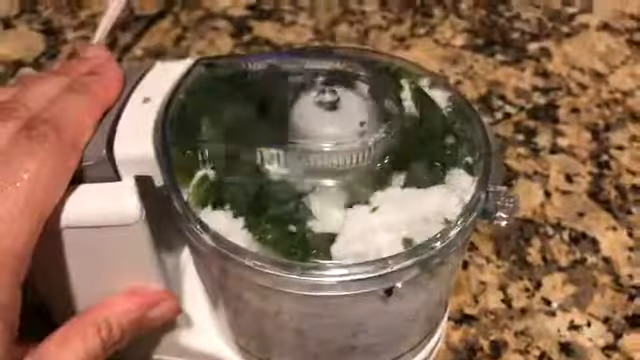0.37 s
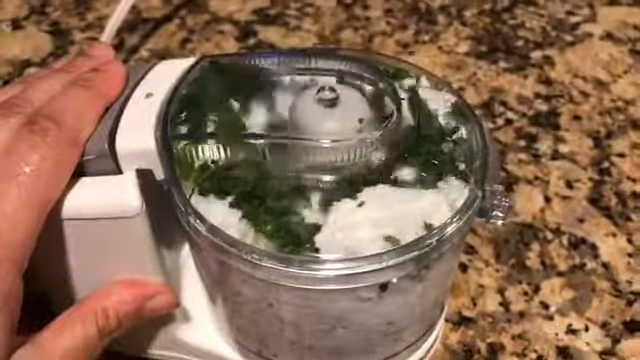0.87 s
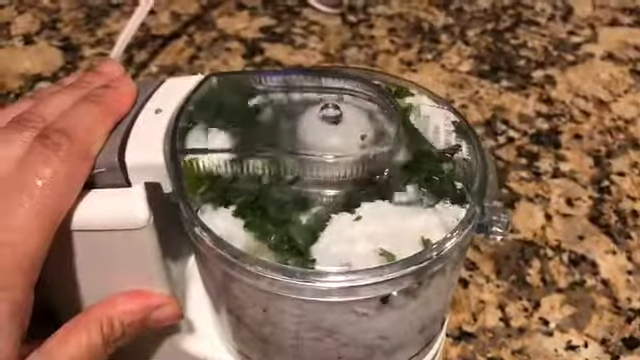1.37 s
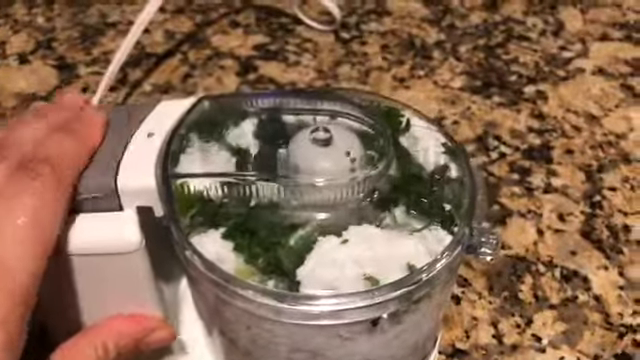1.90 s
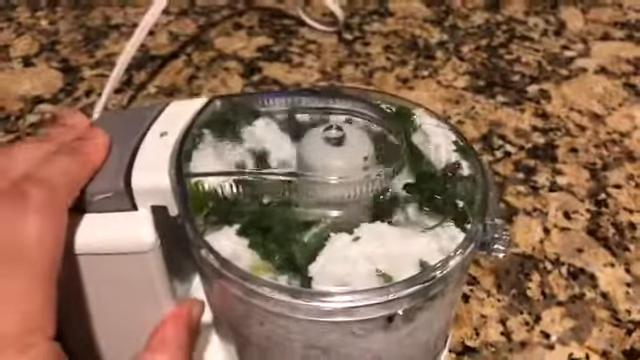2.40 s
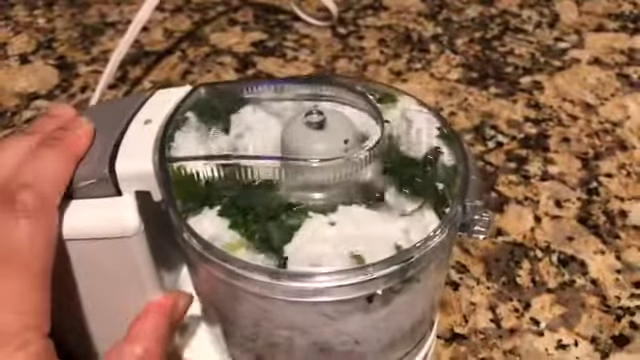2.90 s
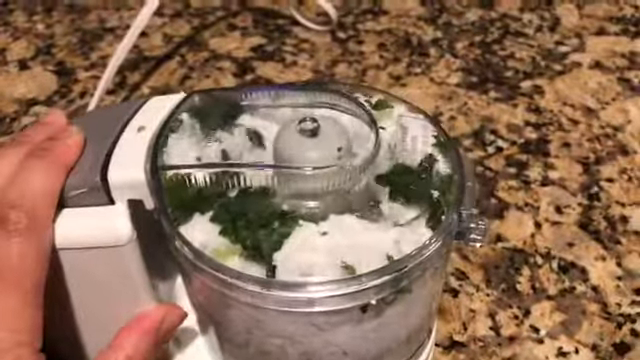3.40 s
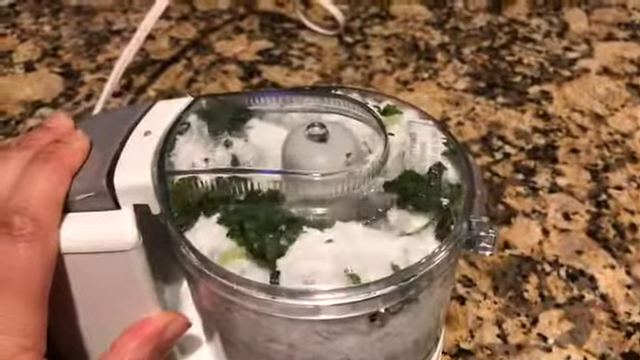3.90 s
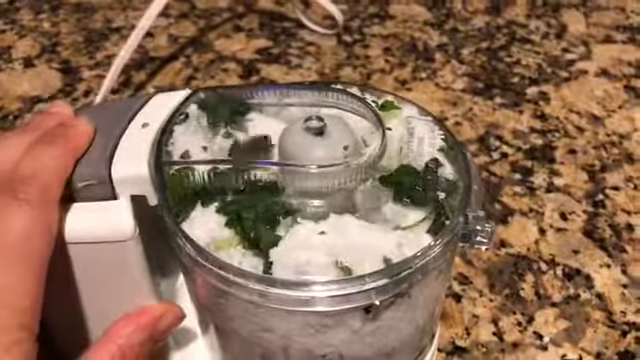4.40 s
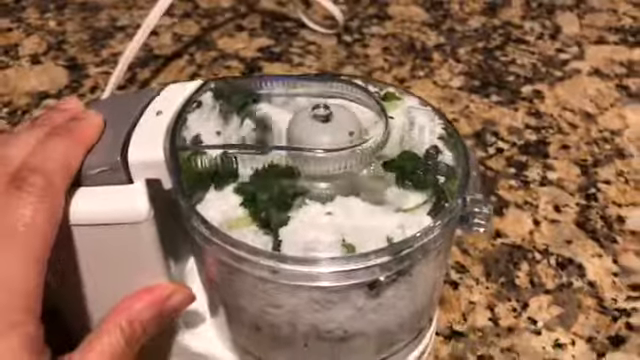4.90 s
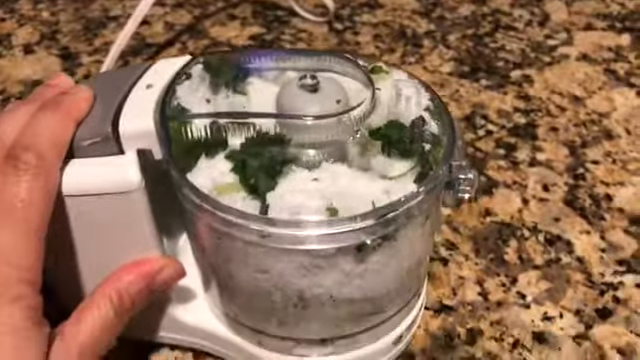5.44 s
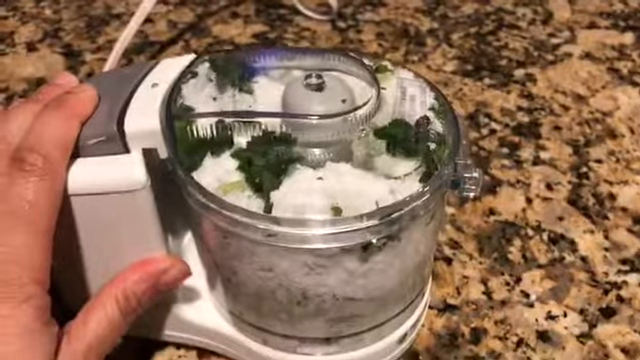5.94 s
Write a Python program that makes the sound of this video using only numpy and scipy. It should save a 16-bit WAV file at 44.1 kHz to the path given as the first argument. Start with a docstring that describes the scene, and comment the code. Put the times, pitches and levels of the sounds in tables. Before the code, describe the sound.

Close to a small food chopper in a kitchen, a switch clicks and a shrill geared whine leaps up with harsh plastic rattle and soft thuds of food. After about a second and a half it slides down to a near-quiet gap with faint ticks and a sharp click. A longer burst follows, coasts down, then a third begins before the motor has quite rested and runs to the end.

```python
"""Geared food chopper in three pulses

A small chopper on a stone counter: a motor pinion and a wheel mesh whine as tones on a running tooth count.
Noise knocks through housing resonances give the rattle of the teeth; lumps of food strike decaying bowl modes.
Filtered noise bursts make the switch clicks and faint ticks; a distant appliance hums as a sine over room noise.
A short noise tail forms the room, and gain control lifts the pauses."""
import sys
import numpy as np
from scipy import signal
from scipy.fft import rfft, irfft
from scipy.io import wavfile
from scipy.ndimage import uniform_filter1d

SR = 44100
rng = np.random.default_rng(int(sys.argv[2]) if len(sys.argv) > 2 else 0)


def elevation(decibels):
    """Turn decibel levels (scalar or array-like) into linear amplitude ratios."""
    levels = np.asarray(decibels, float)
    return 10 ** (levels / 20)


def wav_record(signal):
    """Record a signal, one row per channel, as 16-bit PCM in the file named by sys.argv[1]."""
    frames = np.transpose(np.atleast_2d(signal))
    bounded = np.clip(frames, -1, 1)
    # unit amplitude maps onto the largest positive 16-bit level
    quanta = np.round(bounded * 32767).astype(np.int16)
    wavfile.write(sys.argv[1], SR, quanta)


N = 266849
FULL_HZ = 2900   # pinion mesh rate taken as full speed

# Button presses: motor_on_s [s], motor_off_s [s], blade_angle at start [rad]
PULSES = [(0.165, 1.66, 1.2), (2.28, 4.35, -1.9), (4.773, 6.2, -2.5)]
# Food loading the drive: start_s [s], mesh_goal_hz [Hz, pinion], pinion_level_db [dB], wheel_level_db [dB]
LOAD = [(0.16, 2778, -25.5, -13.5), (0.4, 2807, -17.5, -22), (0.5, 2745, -16.5, -16.5),
        (0.6, 2776, -20, -17.5), (0.698, 2963, -21, -25), (0.8, 2808, -19, -19), (1.0, 2870, -23.5, -21),
        (1.102, 2920, -23, -21), (1.28, 2841, -21.5, -18), (1.38, 2977, -15.5, -17),
        (1.45, 2890, -17.5, -24), (1.6, 2963, -17.5, -18.5), (1.662, 2964, -25, -24.5),
        (2.27, 2800, -21, -14.5), (2.549, 2830, -22.5, -19.5), (2.63, 2905, -20.5, -20),
        (2.74, 3010, -15.5, -17.5), (2.852, 3000, -21, -21), (2.95, 2909, -16, -15.5),
        (3.172, 2893, -34, -25.5), (3.25, 2949, -17.5, -18), (3.298, 2834, -26, -16),
        (3.44, 2819, -22, -12), (3.54, 2900, -28, -21.5), (3.7, 2960, -24, -17.5),
        (3.79, 2801, -19.5, -16.5), (3.939, 2992, -25.5, -21), (4.04, 2924, -21.5, -17),
        (4.141, 2917, -23.5, -22.5), (4.3, 2998, -18.5, -18.5), (4.349, 2908, -24.5, -24),
        (4.76, 2827, -23.5, -13), (4.989, 2867, -26, -25.5), (5.09, 2995, -14, -14),
        (5.151, 2966, -16, -17.5), (5.332, 3016, -20.5, -19.5), (5.4, 3001, -17, -17.5),
        (5.491, 3005, -17, -13.5), (5.55, 2940, -17, -17), (5.638, 2961, -18, -16.5),
        (5.758, 3068, -19, -17), (5.838, 3028, -19.5, -15.5), (5.932, 3077, -26, -15.5),
        (6.05, 3012, -19, -17)]


def motor():
    """First-order spin-up to the loaded speed, then coasting under drag and dry friction to a halt.

    Returns the pinion mesh rate in Hz, starting surge 0-1, coasting 0-1 and engagement gain.
    """
    spin_up_s, head_start_s = .052, .006   # time constant; slack taken up at once
    surge_s, grip_s = 0.085, 0.004         # delay of peak starting torque; engagement of the teeth
    coast_s, friction_hz, still_hz = .4, 2900, 150
    now = np.arange(N) / SR
    load_s, goal_hz = np.transpose(LOAD)[:2]
    mesh_hz, surge, coasting, engaged = np.zeros((4, N))
    for on_s, off_s, angle in PULSES:
        since = np.maximum(now - on_s, 0)
        after = np.maximum(now - off_s, 0)
        loaded_hz = np.interp(np.minimum(now, off_s), load_s, goal_hz)
        driven_hz = loaded_hz * (1 - np.exp(-(since + head_start_s) / spin_up_s))
        pulse_hz = (driven_hz + friction_hz) * np.exp(-after / coast_s) - friction_hz
        turning = (now >= on_s) & (pulse_hz > still_hz)
        mesh_hz += turning * pulse_hz
        surge += (since / surge_s * np.exp(1 - since / surge_s)) ** 2
        coasting += turning * (1 - np.exp(-after / grip_s))
        fade = np.minimum(pulse_hz / still_hz - 1, 1)   # fades out just before standstill
        engaged += turning * (1 - np.exp(-since / grip_s)) * fade
    return np.maximum(mesh_hz, still_hz), surge, coasting, engaged


def whine(teeth, smear_hz, rough):
    """Phase synthesis: a tone on a tooth count, part clean, part smeared by uneven contact; rms near 1."""
    rough = np.clip(rough, 0, 1)
    smear = (drift(smear_hz) + 1j * drift(smear_hz)) / np.sqrt(2)
    envelope = np.sqrt(1 - rough) + np.sqrt(rough) * smear
    return np.sqrt(2) * np.real(envelope * np.exp(2j * np.pi * teeth))


# Weaker mesh partials: pinion_multiple [-], wheel_multiple [-], level_db [dB re rattle setting], smear_hz [Hz]
PARTIALS = [(0, 2, -6.5, 55), (1, 1, -16.5, 24), (3, 0, -11, 410), (4, 0, -16, 690), (5, 0, -20, 560)]
# Shaft unbalance tones: pinion_mesh_multiple [-], level_db [dB re rattle setting]
SHAKE = [(1 / 13, -21), (1 / 25.0, -19)]
# Housing resonances: pitch_hz [Hz], width_hz [Hz], level_db [dB]
HOUSING = [(895, 390, -13.5), (1395, 43, -6.5), (1785, 490, -6), (2008, 312, 3), (2535, 63, -2),
           (2685, 130, 0), (3260, 180, -6), (3687, 550, -6), (4307, 146, -9.5), (5602, 76, -3.5),
           (5962, 190, -9), (6182, 28, -3.5), (7180, 280, -15.5), (8640, 1400, -22.5), (9730, 90, -16),
           (11850, 170, -17), (14350, 1800, -25)]
# Broad casing spectrum under the resonances: pitch_hz [Hz], level_db [dB per Hz]
CASING = [(60, -24), (150, -21), (300, -17), (1000, -21), (2200, -6), (3500, -15.5), (5000, -18.5),
          (6500, -15.5), (8000, -26.5), (10500, -30), (13000, -27.5), (15500, -33)]


def gears(mesh_hz, pinion_db, wheel_db, octave_db, rattle_db, hiss_db):
    """Gear-mesh excitation: tones and tooth rattle, modulated by shaft turns, blade load and the mains."""
    pinion_teeth, teeth_per_blade_turn = 13, 138.3
    wheel_mesh = .6536   # second mesh rate over first
    mains_throb_hz = 120
    chatter_db, chatter_hz = 7, 35
    teeth = np.cumsum(mesh_hz * (1 + 0.00268 * drift(30.8))) / SR
    motor_turn = 2 * np.pi * teeth / pinion_teeth
    blade_turn = 2 * np.pi * np.cumsum(mesh_hz) / SR / teeth_per_blade_turn
    for on_s, off_s, angle in PULSES:
        start = int(on_s * SR)
        blade_turn[start:] += angle - blade_turn[start]

    # two unlike blades load and unload the wheel
    bite_db = 3.5 * np.cos(blade_turn) + 4.5 * np.cos(2 * blade_turn + 2.1) + 2.5 * np.cos(3 * blade_turn - 1.5)
    bite = rms_one(elevation(bite_db))
    throb = 1 + .16 * np.cos(2 * np.pi * mains_throb_hz * np.arange(N) / SR)
    loose = np.clip(1 - mesh_hz / 2700, 0, 1)   # chatter grows below 2700 Hz
    wobble = 1 + .42 * np.cos(motor_turn)       # an off-centre pinion gives side lines
    # at low speed the pinion whines break into fragments
    wobble = wobble * elevation(-chatter_db * np.sqrt(loose) * drift(chatter_hz) ** 2)

    grid_hz = np.arange(10, 16000, 10.)
    radiated = uniform_filter1d(response(grid_hz, CASING, HOUSING), size=15)
    radiated *= np.minimum(grid_hz / 1500, 1) ** 2   # a small housing sends out low tones poorly

    def through(order):
        """Resonant transfer: a gliding tone swells where it meets a housing resonance."""
        gain = np.interp(order * mesh_hz, grid_hz, radiated)
        return (gain / np.interp(order * FULL_HZ, grid_hz, radiated)) ** .6

    tones = elevation(pinion_db) * through(1) * wobble * whine(teeth, 90, rough=.2 + 2.5 * loose)
    wheel_tone = whine(wheel_mesh * teeth, 60, rough=.12 + 2 * loose)
    tones += elevation(wheel_db) * bite * through(wheel_mesh) * wheel_tone
    tones += elevation(octave_db) * wobble * through(2) * whine(2 * teeth, 140, rough=.6 + loose)
    for pinion, wheel, level_db, smear_hz in PARTIALS:
        order = pinion + wheel * wheel_mesh
        tones += elevation(rattle_db + level_db) * through(order) * whine(order * teeth, smear_hz, rough=0.84)
    for order, level_db in SHAKE:
        tones += elevation(rattle_db + level_db) * whine(order * teeth, 23.5, rough=0.9)

    # teeth knock in uneven bunches
    knocks = rng.standard_normal(N) * elevation(2.0 * drift(500) + 0.2 * drift(9.9))
    knocks = knocks * throb * bite ** .3
    broad = colour(knocks, CASING)
    ringing = colour(knocks, CASING, HOUSING)
    # the housing rings less at low speed
    rattle = rms_one(broad + (ringing - broad) * (1 - loose) ** 1.8)
    high_pass = signal.butter(4, 6600, "high", fs=SR, output="sos")
    hiss = signal.sosfiltfilt(high_pass, rattle)
    body = elevation(rattle_db + 8) * (rattle - hiss)
    return tones * throb ** 0.36 + body + elevation(hiss_db - 5.0) * rms_one(hiss)


# Bowl modes: pitch_hz [Hz], level_db [dB], t60_s [s]
BOWL = [(246, -38, 0.088), (414, -4, 0.056), (549.7, -2.5, 0.093), (577.5, -8, 0.19), (642, -9.5, 0.16),
        (1320, -2, 0.044), (1850, -11.5, 0.044), (2290, -5.5, 0.036)]
# Loudest thuds of food: start_s [s], level_db [dB, relative strength of the blow]
THUDS = [(0.229, -10.5), (0.779, -10), (0.927, -18), (0.98, -5.5), (1.412, -6.5), (1.555, -9), (1.662, -5),
         (1.75, -10), (1.996, -17.5), (2.604, -11.5), (2.644, -6.5), (2.811, -16), (2.949, -13), (3.13, -9),
         (3.188, -8), (3.236, -8), (3.383, -14), (3.659, -15), (3.878, -28), (4.002, -14), (4.515, -20),
         (4.873, -5.5), (5.302, -10.5), (5.437, -20), (5.67, -11), (5.763, -9), (5.897, -10), (5.987, -14)]


def bowl(rattle_db):
    """Modal synthesis: listed thuds and many small random ones strike decaying modes through a soft contact."""
    # at each start the blade takes up its slack with a thud
    start_thuds = [(on_s + .004, -21) for on_s, off_s, angle in PULSES]
    rows = np.array(list(THUDS) + start_thuds)
    at = (rows[:, 0] * SR).astype(int)
    mode_spread_db = rng.normal(0, 3.0, (len(rows), len(BOWL)))
    struck = rng.random(N) < 70.0 / SR   # 70 small blows a second on average
    small = struck * elevation(rattle_db - 5.0 + 1.03 * np.minimum(rng.exponential(1, N), 4))
    out = 0
    for k, (hz, level_db, t60) in enumerate(BOWL):
        hits = small * rng.standard_normal(N)
        hits[at] += elevation(rows[:, 1] - 11.5 + mode_spread_db[:, k])
        out = out + elevation(level_db) * ring(hits, hz, t60)
    return signal.lfilter([.3], [1, -.7], out)   # soft contact dulls the blows


# Switch modes: pitch_hz [Hz], level_db [dB], t60_s [s]
SWITCH = [(1400, -10, .012), (2100, -3, .011), (4200, -3, .008), (6800, -4, .006), (9300, -6, .005),
          (13000, -6, .004)]
# Switch and housing clicks: start_s [s], level_db [dB, relative], brightness [dB per octave]
CLICKS = [(0.0, -23, -7), (0.166, -20, -0.5), (2.1755, -4.5, 0.2), (2.278, -10.5, -8), (4.6905, -7, -4),
          (4.7718, -22, -5)]


def switch():
    """Transient excitation: a scuffle of contacts gives a dry crack that lightly rings the switch modes."""
    s = np.arange(2600) / SR
    scuffle = np.minimum(s / .001, 1) * (np.exp(-s / .002) + .15 * np.exp(-s / .008))
    high_pass = signal.butter(2, 1150, "high", fs=SR, output="sos")
    out = np.zeros(N + len(s))
    for (at, level_db, tilt_db), noise in zip(CLICKS, rng.standard_normal((len(CLICKS), len(s)))):
        crack = signal.sosfilt(high_pass, noise * scuffle)
        modes = sum(elevation(db) * ring(crack, hz, t60) for hz, db, t60 in SWITCH)
        crack = crack + elevation(-24) * modes
        slope = [(500, -3 * tilt_db), (4000, 0), (16000, 2 * tilt_db)]   # (Hz, dB)
        start = int(at * SR)
        out[start:start + len(s)] += elevation(level_db - 5.0) * colour(crack, slope)
    return out[:N]


# Faint ticks of fingers and settling food: start_s [s], level_db [dB, relative], pitch_hz [Hz]
TICKS = [(0.021, -23, 6040), (0.0444, -24, 7050), (0.0947, -24.5, 6860), (0.1244, -28, 5240),
         (1.963, -25, 5760), (1.9845, -21, 4760), (2.0206, -25, 6020), (2.0607, -32, 6880),
         (2.1066, -30, 9430), (2.1286, -29, 5990), (2.1993, -39, 4040), (2.2553, -23, 3819),
         (4.6528, -26, 5230), (4.7193, -20, 4620)]


def ticks():
    """Band-limited transients: short dry noise puffs, each around a pitch of its own."""
    s = np.arange(2000) / SR
    out = np.zeros(N + len(s))
    for (at, level_db, hz), noise in zip(TICKS, rng.standard_normal((len(TICKS), len(s)))):
        band = signal.butter(1, [hz / 1.35, min(hz * 1.15, 16000)], "band", fs=SR, output="sos")
        puff = signal.sosfilt(band, noise * np.exp(-s / 0.012))
        start = int(at * SR)
        out[start:start + len(s)] += elevation(level_db - 13.0) * puff
    return out[:N]


def kitchen(x):
    """Reverberation by convolution: an exponentially dying noise tail, duller in the treble, after a short gap."""
    t60_s, gap_s = .25, .006
    s = np.arange(SR // 2) / SR
    dull_noise = signal.lfilter([1], [1, -.5], rng.standard_normal(len(s)))
    tail = dull_noise * elevation(-60 * s / t60_s) * (s > gap_s)
    return signal.fftconvolve(x, tail / np.sqrt(np.sum(tail ** 2)))[:N]


def appliance_hum():
    """Pure tone: a distant appliance hums as one steady sine."""
    now = np.arange(N) / SR
    return elevation(-41.5) * np.sqrt(2) * np.sin(2 * np.pi * 59.4 * now)


# Room noise spectrum: pitch_hz [Hz], level_db [dB per Hz, relative]
ROOM_NOISE = [(60, -34), (100, -9.5), (140, -20), (600, -20.5), (850, -31), (1430, -21), (3700, -31),
              (6260, -31.5), (7900, -35), (15500, -47)]


def room_noise():
    """Stationary noise: white noise shaped to the spectrum of the room."""
    return elevation(-52.5) * rms_one(colour(rng.standard_normal(N), ROOM_NOISE))


def rms_one(x):
    """Normalization: scale to an rms of 1."""
    return x / np.sqrt(np.mean(np.abs(x) ** 2) + 1e-20)


def response(hz, points, resonances=()):
    """Power addition: gain of a broad spectrum plus resonance peaks."""
    points_hz, points_db = np.transpose(points)
    power = elevation(2 * np.interp(np.log(hz), np.log(points_hz), points_db))
    for centre_hz, width_hz, peak_db in resonances:
        power = power + elevation(2 * peak_db) / (1 + (2 * (hz - centre_hz) / width_hz) ** 2) ** 2
    return np.sqrt(power)


def colour(x, points, resonances=()):
    """Linear filtering: multiply the spectrum by a broad and resonant response."""
    hz = np.maximum(np.fft.rfftfreq(len(x), 1 / SR), 1)
    return irfft(rfft(x) * response(hz, points, resonances), len(x))


def drift(rate_hz):
    """Random modulation: noise twice through a one-pole low-pass, rms 1."""
    r = np.exp(-2 * np.pi * rate_hz / SR)
    settling = 8000   # samples dropped while the filter settles
    noise = rng.standard_normal(N + settling)
    return rms_one(signal.lfilter([1], [1, -2 * r, r * r], noise)[settling:])


def ring(clicks, hz, t60):
    """Damped oscillator: a unit click sets a decaying sine of initial height 1 ringing."""
    r, w = elevation(-60 / (t60 * SR)), 2 * np.pi * hz / SR
    return signal.lfilter([0, np.sin(w)], [1, -2 * r * np.cos(w), r * r], clicks + 1e-18)


def scene():
    """Superposition: the chopper and its reverberation over hum and room noise."""
    now = np.arange(N) / SR
    mesh_hz, surge, coasting, engaged = motor()
    # near this mesh rate the teeth bounce: the whine gives way to its octave
    shudder_hz, shudder_width_hz = 1850, 140
    shudder = np.exp(-((mesh_hz - shudder_hz) / shudder_width_hz) ** 2)
    load_s, goal_hz, pinion_db, wheel_db = np.transpose(LOAD)

    def level(full_db, halving_db, surge_db, coast_db, shudder_db, flicker_db):
        """Level law in dB: speed (halving_db lost per halving), surge, coasting, shudder and random flicker."""
        return (full_db + halving_db * np.log2(mesh_hz / FULL_HZ) + surge_db * surge + coast_db * coasting
                + shudder_db * shudder + flicker_db * drift(13.6))

    rattle_db = level(-23, halving_db=8.5, surge_db=3, coast_db=2.9, shudder_db=4, flicker_db=1.4)
    pinion_db = np.interp(now, load_s, pinion_db) + level(
        0.1, halving_db=3, surge_db=10, coast_db=7.5, shudder_db=-7, flicker_db=2.0)
    wheel_db = np.interp(now, load_s, wheel_db) + level(
        0.1, halving_db=2, surge_db=1.5, coast_db=4, shudder_db=-8, flicker_db=0.46)
    octave_db = level(-24.5, halving_db=5.5, surge_db=1, coast_db=1, shudder_db=7.5, flicker_db=0)
    hiss_db = level(-24, halving_db=9.5, surge_db=6, coast_db=2.8, shudder_db=-3, flicker_db=1.5)
    whirr = gears(mesh_hz, pinion_db, wheel_db, octave_db, rattle_db, hiss_db) * engaged
    thuds = bowl(np.where(engaged > 0, rattle_db, -120))
    chopper = whirr + thuds + switch() + ticks()
    return (chopper + elevation(-17) * kitchen(chopper) + appliance_hum() + room_noise())[None]


def band_limit(x):
    """A steep low-pass at the top of the band."""
    return signal.sosfilt(signal.butter(12, 16810, fs=SR, output="sos"), x)


def record(dry):
    """Dynamic compression: gain ducks and recovers smoothly; peaks are rounded and the top is cut."""
    low_cut = signal.butter(6, 47, "high", fs=SR, output="sos")   # microphone low cut
    dry = signal.sosfilt(low_cut, dry)
    level_db = 10 * np.log10(uniform_filter1d(dry[0] ** 2, size=882) + 1e-9)
    fall_db = 90.0 * np.arange(N) / SR   # the held level falls by at most 90 dB per second
    held_db = np.maximum.accumulate(level_db + fall_db) - fall_db
    r = np.exp(-1 / (.07 * SR))          # 0.07 s smoothing, rising and falling alike
    held_db = signal.lfilter([1 - r], [1, -r], held_db - held_db[0]) + held_db[0]
    levelled = dry * elevation(-.22 * (np.maximum(held_db, -38.0) + 12.0))
    rounded = 0.99 * np.tanh(levelled / 1.137)
    top_cut = signal.ellip(12, .5, 70, 15750, fs=SR, output="sos")
    mix = signal.sosfilt(top_cut, rounded)
    return band_limit(mix)


dry = scene()
out = record(dry)
wav_record(out)
```